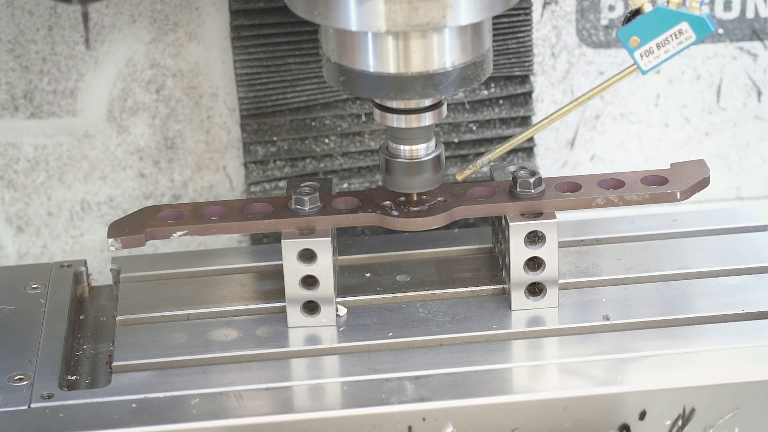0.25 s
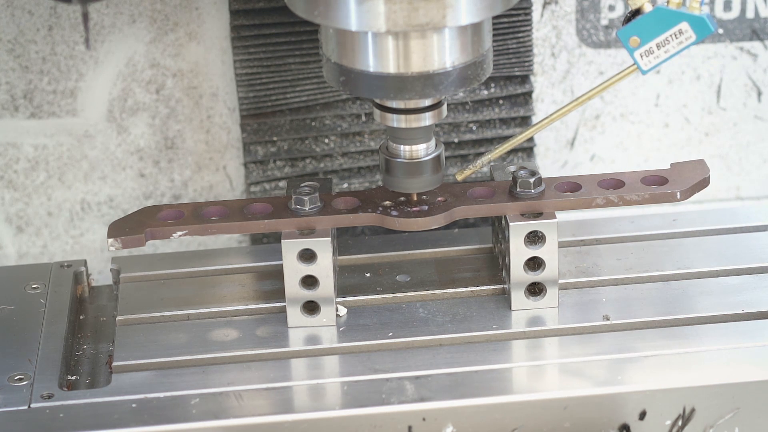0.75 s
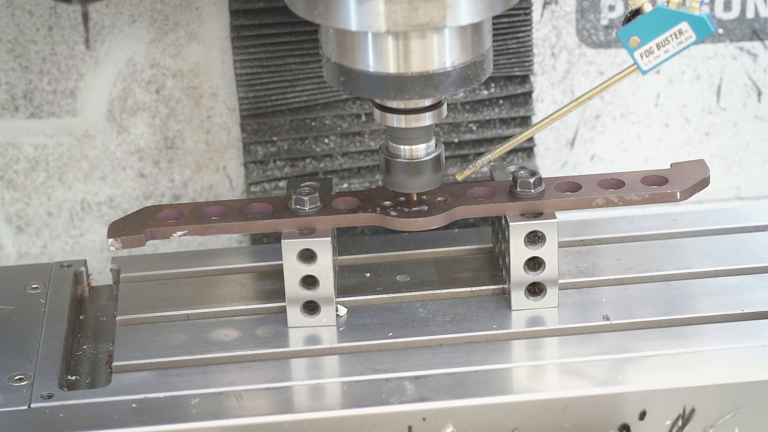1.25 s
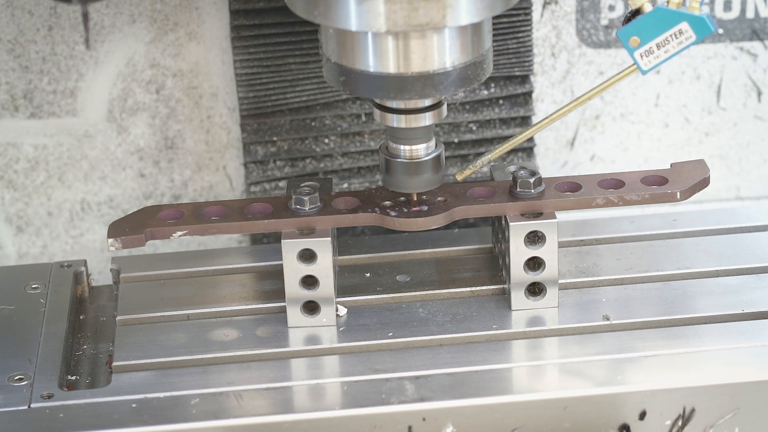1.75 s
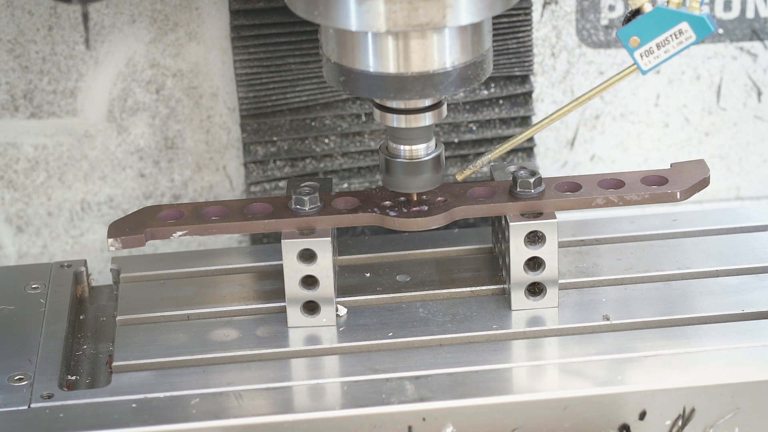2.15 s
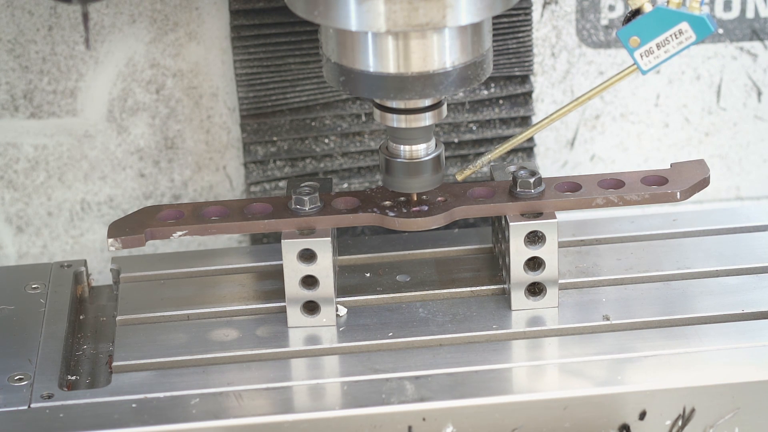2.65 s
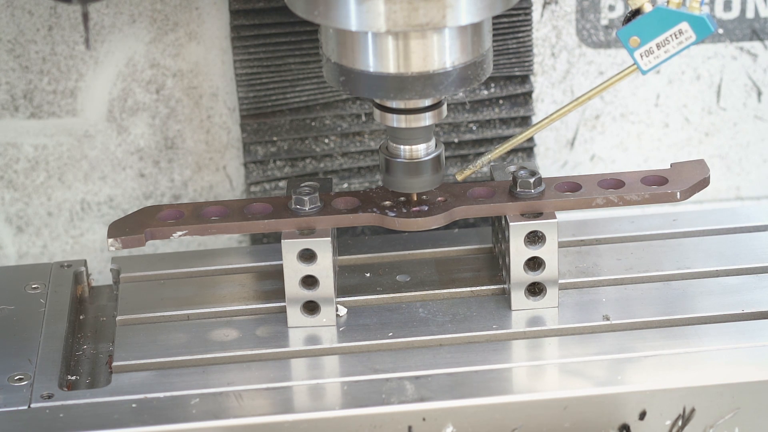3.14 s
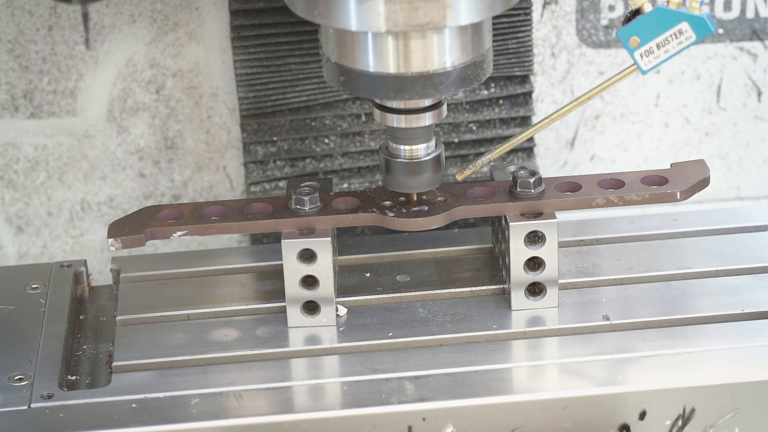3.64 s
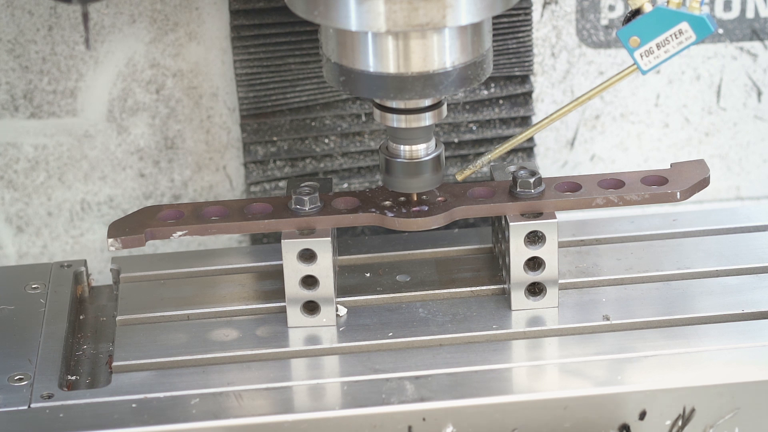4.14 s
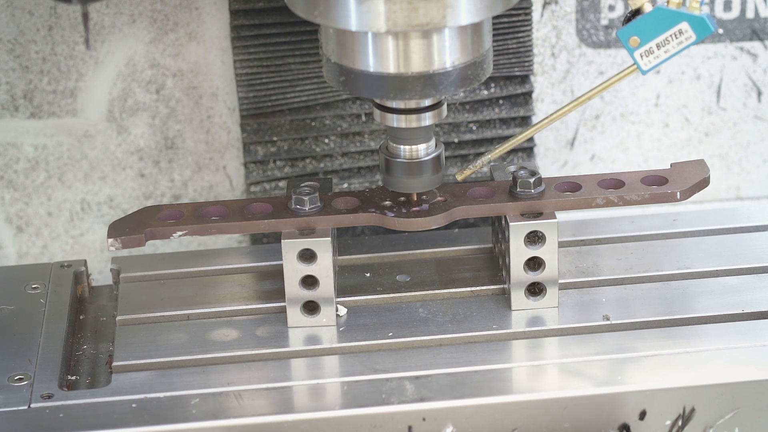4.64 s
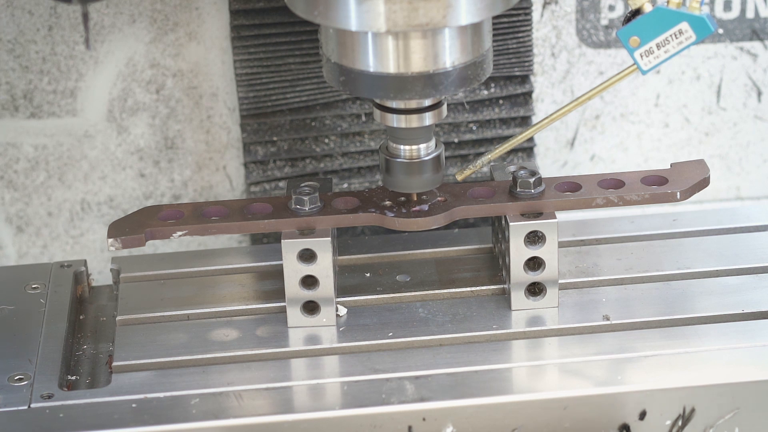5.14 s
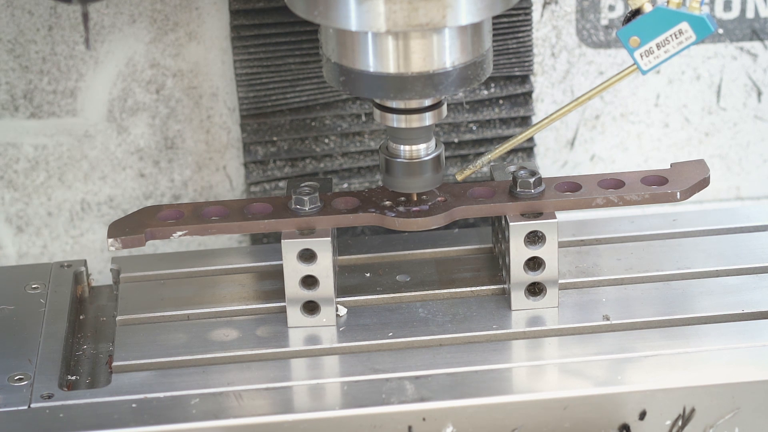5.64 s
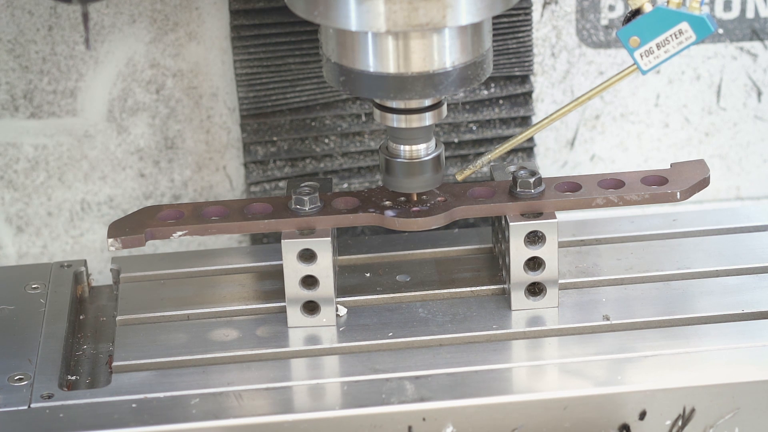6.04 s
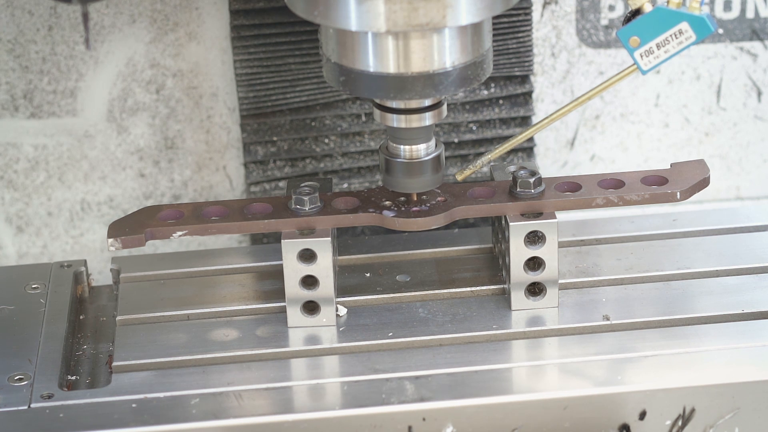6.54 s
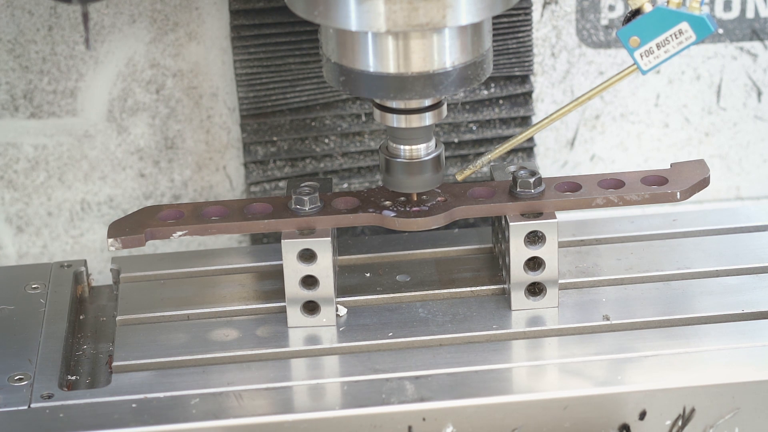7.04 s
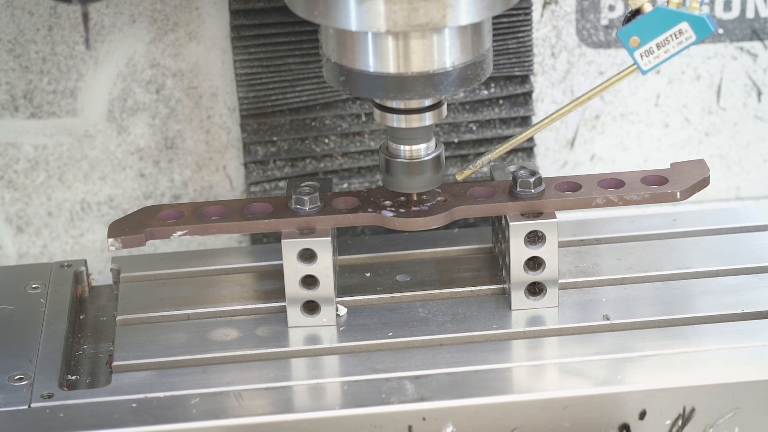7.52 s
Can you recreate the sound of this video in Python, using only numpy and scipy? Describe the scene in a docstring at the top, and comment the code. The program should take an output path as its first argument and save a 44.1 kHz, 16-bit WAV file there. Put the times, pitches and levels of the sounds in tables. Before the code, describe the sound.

A close coolant mist jet hisses continuously for nearly eight seconds inside a milling machine's hard metal enclosure, with short dense echoes. At about 0.1 s a quick double knock rings a panel, followed at 0.2 s by soft deep thuds. The hiss is bright, slightly sputtering, with thin unsteady whistles around 4 to 6 kHz drifting in and out. It eases, swells near 3.2 s, then surges hardest about 4.2 s. Between 4.3 and 5 s its colour changes, with lower whistles and a brief treble sizzle near 4.7 s. A very faint knock falls at 5.0 s. By 5.5 s the hiss is weaker and duller, staying fairly steady. Quiet rumble and wavering motor hum lie underneath, the hum passing to other pitches around 5.3 s. A low drone near 100 Hz swells at 7.5 s and fades with a beat. Mono, steeply cut top.

```python
"""Coolant jet in a milling machine

Place: inside a CNC mill's metal enclosure, where a light cut is taken in a clamped steel bar.
A mist nozzle hisses (banded noise); holes, edges and the cutter gap lift narrow bands of it (resonators).
Behind it: rumble (low noise), motor hum (wavering sines), two knocks (damped modes), thuds, a short low drone.
Distance: the jet is close, its direct sound above the wall echoes (noise tails).
Microphone: one mono point, the same in both channels, with the top cut steeply."""
import sys
import numpy as np
from scipy import signal
from scipy.io import wavfile

SR = 44100
rng = np.random.default_rng(int(sys.argv[2]) if len(sys.argv) > 2 else 0)


def to_wav(s):
    """Save 16-bit WAV."""
    ch = np.atleast_2d(s).T  # columns
    pcm = np.round(np.clip(ch, -1, 1) * 32767)  # PCM
    wavfile.write(sys.argv[1], SR, pcm.astype(np.int16))


N = 343098
TIME = np.arange(N) / SR  # s


def from_db(db):
    """Decibels to amplitude gain."""
    return 10 ** (np.asarray(db) / 20)


def rms_one(x):
    """Scale to rms 1."""
    return x / np.sqrt(np.mean(x ** 2) + 1e-20)


def swing(curve):
    """A level curve at every sample, in dB about its mean."""
    seconds, level_db = np.transpose(curve)
    db = np.interp(TIME, seconds, level_db)
    return db - db.mean()


def at_hz(points, hz):
    """Read a spectrum on a log-frequency axis."""
    point_hz, level_db = np.transpose(points)
    return np.interp(np.log(hz), np.log(point_hz), level_db)


def drift(rate_hz):
    """Slow random wander of spread 1: noise through a two-pole lowpass near rate_hz."""
    step = 100  # samples between drawn points
    r = np.exp(-2 * np.pi * rate_hz * step / SR)
    draws = rng.standard_normal(N // step + 2002)
    slow = signal.lfilter([1], [1, -2 * r, r * r], draws)[2000:]  # drop the filter's start
    return np.interp(np.arange(N) / step, np.arange(len(slow)), rms_one(slow))


def noise_bands(edges):
    """Yield (centre Hz, noise) per band; neighbours get unrelated noise."""
    white = rng.standard_normal((2, N))
    for k, (low, high) in enumerate(zip(edges, edges[1:])):
        bandpass = signal.butter(2, [low, high], "band", fs=SR, output="sos")
        yield np.sqrt(low * high), signal.sosfilt(bandpass, white[k % 2])


def resonate(x, hz, width_hz):
    """A two-pole resonance with gain 1 on top."""
    r = np.exp(-np.pi * width_hz / SR)
    zeros = np.array([1, 0, -1]) * (1 - r * r) / 2
    return signal.lfilter(zeros, [1, -2 * r * np.cos(2 * np.pi * hz / SR), r * r], x)


def tone(hz, waver_hz, flutter_db):
    """A sine of rms about 1 that wavers in pitch and level."""
    phase = 2 * np.pi * np.cumsum(hz + waver_hz * drift(4.93)) / SR
    return np.sqrt(2) * np.sin(phase) * from_db(flutter_db * drift(5.2))


# Background: motor tones, steady ones and those of two feed drives.
# Each row: frequency in Hz, level in dB rms.
STEADY_HUM = [(75.4, -69.5), (376.8, -66)]
FIRST_FEED_TONES = [(107.7, -62), (183, -69), (226, -63.5), (306, -69.5), (602.9, -68), (1087, -65)]
SECOND_FEED_TONES = [(118.4, -61), (198, -61.5), (215.3, -59), (468.3, -61.5), (522, -68), (904.4, -65)]


def motors(handover_s=5.33, handover_length_s=1.1):
    """A steady hum; one feed drive hands over to the other, by a crossfade, as the cutting path turns."""
    hum, first, second = [
        sum(from_db(db) * tone(hz, waver_hz=4.025, flutter_db=3.0) for hz, db in tones)
        for tones in (STEADY_HUM, FIRST_FEED_TONES, SECOND_FEED_TONES)]
    turn = np.clip((TIME - handover_s) / handover_length_s + .5, 0, 1) * np.pi / 2
    return hum + np.cos(turn) * first + np.sin(turn) * second


# Background: colour of the machine's rumble. Each row: frequency in Hz, relative level in dB per Hz.
RUMBLE_SPECTRUM = [(22, 5), (50, 4), (80, -2), (110, 5.5), (155, -4), (200, -1), (280, -5), (400, 0),
                   (560, -2), (750, -3), (1100, -7), (2000, -8)]
# How the rumble rises and falls; only the movement about the mean counts.
# Each row: time in seconds, level in dB.
RUMBLE_LEVEL = [(0, -45), (0.45, -51.5), (1.3, -52.5), (2.8, -50), (3.7, -52), (4.6, -47.5), (5.5, -52.5),
                (7.78, -48)]


def rumble(level_db=-48.5, patchy_db=1.0, follows_hiss=0.8, deep_hz=70):
    """Broad low noise of spindle, fans and frame; its deepest part is air, and swells with the hiss."""
    deep = from_db(follows_hiss * swing(HISS_LEVEL))
    upper = from_db(swing(RUMBLE_LEVEL))
    noise = 0
    for hz, band in noise_bands(np.geomspace(20, 2560, 15)):
        gain = from_db(at_hz(RUMBLE_SPECTRUM, hz) + patchy_db * drift(3.6))
        noise = noise + band * gain * (deep if hz < deep_hz else upper)
    return rms_one(noise) * from_db(level_db)


def drone(pitch_hz=101, octave_db=-17, crest_s=7.567, crest_db=-34, attack_s=0.15,
          fade_db_per_s=27, beat_hz=4.7, beat_depth_db=18):
    """A low mode of the frame swells to its first crest, then beats and dies away."""
    octave = tone(2 * pitch_hz, waver_hz=5.0, flutter_db=0.0)
    voice = tone(pitch_hz, waver_hz=2.0, flutter_db=2.0) + from_db(octave_db) * octave
    age = TIME - crest_s
    attack = np.clip(1 + age / attack_s, 0, 1)
    beat = np.sin(np.pi * beat_hz * age) ** 2
    fade_db = fade_db_per_s * np.maximum(age, 0)
    return voice * attack * from_db(crest_db - fade_db - beat_depth_db * beat)


# Soft thuds deep in the bass.
# Each row: middle in seconds, Gaussian spread in seconds, frequency in Hz, level in dB rms at the middle.
SOFT_THUDS = [(0.182, 0.026, 47.4, -35.5), (0.214, 0.0074, 72.8, -32.5), (0.275, 0.011, 45, -45),
              (4.27, .025, 32, -48)]


def thuds():
    """Brief low shudders: wavering sines under short bell-shaped envelopes."""
    out = np.zeros(N)
    for s, spread_s, hz, db in SOFT_THUDS:
        envelope = np.exp(-.5 * ((TIME - s) / spread_s) ** 2)
        out += from_db(db) * envelope * tone(hz, waver_hz=6.9, flutter_db=-3.0)
    return out


# Contacts that knock the machine. Each row: time in seconds, strength in dB.
CONTACTS = [(0.080, -34), (0.0855, -31.5), (5.037, -44)]
# Modes of the panel they ring. Each row: frequency in Hz, gain in dB, 60 dB decay time in seconds.
PANEL_MODES = [(324, -16, 0.062), (435, -3.5, 0.19), (570, -12, 0.073), (657, -1, 0.054), (800, 2.5, 0.11),
               (1180, -11, 0.022), (1660, -6, .03)]


def knock():
    """A quick double contact, later a faint single one, rings the panel's damped modes."""
    clicks, out = np.zeros(N), np.zeros(N)
    for s, db in CONTACTS:
        clicks[round(s * SR)] = from_db(db)
    for hz, db, t60 in PANEL_MODES:
        r = np.exp(-np.log(1000) / (t60 * SR))
        w = 2 * np.pi * hz / SR
        ring = signal.lfilter([0, np.sin(w)], [1, -2 * r * np.cos(w), r * r], clicks + 1e-18)
        out += from_db(db) * ring
    return out


def turned(middle_s=4.76, length_s=1):
    """Progress from 0 to 1 as the cutting path turns and the jet meets the bar from another side."""
    return np.clip((TIME - middle_s) / length_s + .5, 0, 1)


# Close by: mean colour of the jet. Each row: frequency in Hz, relative level in dB per Hz.
JET_SPECTRUM = [(500, -28.5), (1000, -17), (1300, -13), (1800, -9), (2400, -11.5), (3100, -4.5), (3800, -4),
                (4400, -1), (5400, 1), (6400, 0), (8000, -1), (11000, -2.5), (13500, -4.5), (15800, -1.5)]
# The jet's low rush, its main hiss as the bar moves under it, and its fine treble spray.
# Each row: time in seconds, level in dB; only the movement about the mean counts.
RUSH_LEVEL = [(0, -35), (0.3, -39.5), (2.7, -39.0), (3.2, -36.7), (4.6, -34.5), (5.55, -39.0),
              (7.78, -35.5)]
HISS_LEVEL = [(0, -24), (0.65, -26.0), (1.1, -24.0), (1.7, -26), (2.6, -26.5), (3.15, -21.5), (3.7, -25),
              (4.05, -24), (4.25, -18.5), (4.6, -23.5), (4.78, -23), (5.55, -30.5), (7, -27.5), (7.78, -28)]
SPRAY_LEVEL = [(0, -23), (0.7, -29), (1.15, -27.5), (1.65, -31.5), (2.5, -33), (3.3, -26.9), (4.0, -29),
               (4.22, -24), (4.45, -25), (4.62, -29.5), (5.7, -31), (7.78, -29)]


def jet(level_db=-22.0, flicker_db=0.47, sputter_db=0.23, top_follows=1.08, top_turn_db=-4.5):
    """Turbulent air and mist as banded noise; the top swings wider than the spray and dulls in the turn."""
    rush, hiss, spray = swing(RUSH_LEVEL), swing(HISS_LEVEL), swing(SPRAY_LEVEL)
    turn = turned()
    top = top_follows * spray + top_turn_db * (turn - turn.mean())
    parts = [rush, hiss, hiss, spray, top]
    part_hz = [3000, 5100, 6400, 8800, 13500]
    edges = np.concatenate([np.geomspace(400, 3200, 9)[:-1], np.geomspace(3200, 18500, 19)])
    out, power = 0, 0
    for hz, band in noise_bands(edges):
        band = band * from_db(at_hz(JET_SPECTRUM, hz))
        power += np.mean(band ** 2)
        # each part rules its own stretch of the spectrum and blends into the next
        shares = [np.interp(hz, part_hz, own) for own in np.eye(len(parts))]
        movement_db = sum(share * part for share, part in zip(shares, parts))
        out = out + band * from_db(movement_db + flicker_db * drift(14.4))
    # uneven droplets in the stream make the whole hiss sputter a little
    return out / np.sqrt(power) * from_db(level_db + sputter_db * drift(35))


# Resonances of the gap between cutter and bar. Each row: frequency in Hz, width in Hz,
# peak gain on the jet in dB before the turn, the same in dB after it.
GAP_RESONANCES = [(1530, 63, -9.5, -3.5), (1800, 140, -5.5, -1.5), (1980, 170, -3.5, -20),
                  (2480, 68, -32, -13), (4440, 81, -6, -3), (4860, 240, -15, -4), (5420, 85, -6, -8),
                  (5820, 65, -7.5, -17), (6540, 90, -27, -6), (6750, 200, -22, -5), (7080, 155, -4.5, -24),
                  (7560, 120, -2, -32), (8680, 150, -7, -9), (9680, 470, -12.5, -20), (12100, 100, -9, -9)]


def gap(air, waver_db=1.0):
    """The cutter gap lifts narrow bands of the jet unsteadily; the turn changes which ones stand out."""
    turn = turned()
    out = np.zeros(N)
    for hz, width_hz, before_db, after_db in GAP_RESONANCES:
        gain = (1 - turn) * from_db(before_db) + turn * from_db(after_db)
        out += gain * from_db(waver_db * drift(3.7)) * resonate(air, hz, width_hz)
    return out


# The jet crosses a hole and whistles, or splits on an edge and sizzles.
# Each row: middle in seconds, length in seconds, frequency in Hz, peak gain on the jet in dB.
HOLE_WHISTLES = [(0.32, 0.25, 5700, 5), (1.05, 0.56, 4450, -2), (1.2, 0.87, 5560, 0), (2.5, 0.86, 5270, 0),
                 (2.97, 0.45, 4840, -4), (3.75, 0.6, 5300, 2), (4.08, 0.26, 2000, -4),
                 (4.2, 0.27, 7220, -3), (4.47, 0.25, 1820, 1), (4.3, 0.25, 4220, 2), (4.683, 0.22, 4310, 2),
                 (4.83, 0.3, 5200, 1), (4.92, 0.33, 2510, 4.5), (5.3, 0.57, 5470, 0)]
EDGE_SIZZLES = [(0.4, 0.55, 14800, -1), (4.24, 0.16, 13800, -4), (4.69, 0.22, 13500, 6),
                (4.77, 0.33, 15400, 9)]


def crossings(air, events, width_hz, fade_s, waver_db):
    """Each hole or edge lifts one band of the jet, fading in and out as the bar moves past."""
    out = np.zeros(N)
    for s, length_s, hz, db in events:
        aim = np.clip((length_s / 2 - np.abs(TIME - s)) / fade_s + .5, 0, 1)
        out += from_db(db + waver_db * drift(4.2)) * aim * resonate(air, hz, width_hz)
    return out


def enclosure(x, near_db=-9.0, near_t60_s=0.053, walls_db=-7.5, walls_t60_s=0.16, count=10):
    """Dense echoes of fixture and walls stripe the hiss; the stripes change as the table travels."""
    t = TIME[:SR // 4]
    decays = []
    for db, t60 in [(near_db, near_t60_s), (walls_db, walls_t60_s)]:
        decays.append((from_db(db), from_db(-60 * t / t60) * (t > .0007)))  # first echo after 0.7 ms
    place = np.linspace(0, count - 1, N)
    out = x.copy()
    for k in range(count):
        response = 0
        for gain, decay in decays:
            response = response + gain * rms_one(decay * rng.standard_normal(len(t))) / np.sqrt(len(t))
        # crossfade from one set of random echoes to the next
        nearness = np.cos(np.clip(place - k, -1, 1) * np.pi / 2)
        out += nearness * signal.oaconvolve(x, response)[:N]
    return out / np.sqrt(1 + sum(gain ** 2 for gain, decay in decays))


def scene():
    """The machine behind, the echoing jet close by, the same in both channels."""
    machine = rumble() + motors() + drone() + thuds() + knock()
    air = jet()
    whistles = crossings(air, HOLE_WHISTLES, width_hz=76, fade_s=0.14, waver_db=2.5)
    sizzles = crossings(air, EDGE_SIZZLES, width_hz=1100, fade_s=0.27, waver_db=0.0)
    mono = enclosure(air + gap(air) + whistles + sizzles) + machine
    return np.array([mono, mono])


def record(dry, cutoff_hz=15700):
    """The top is cut steeply by an elliptic lowpass."""
    return signal.sosfilt(signal.ellip(12, .2, 85, cutoff_hz, fs=SR, output="sos"), dry)


dry = scene()
out = record(dry)
to_wav(out)
```